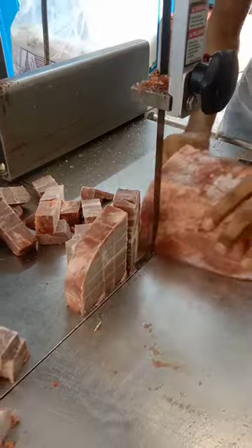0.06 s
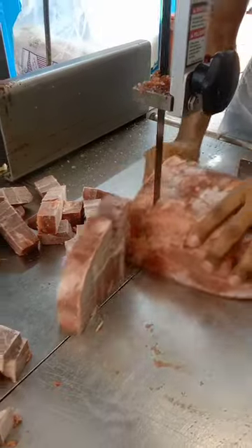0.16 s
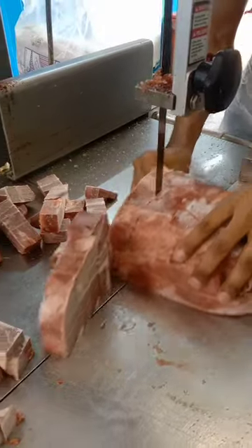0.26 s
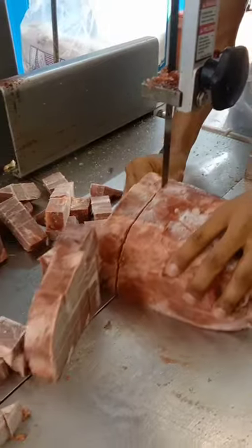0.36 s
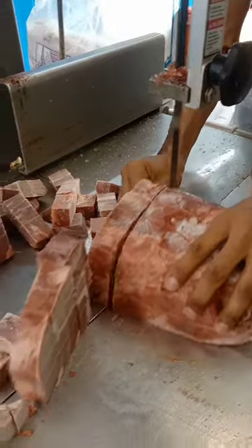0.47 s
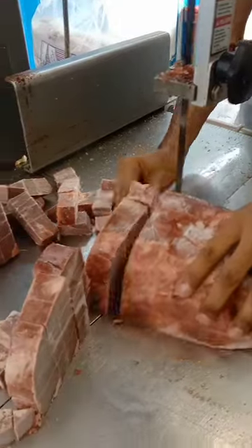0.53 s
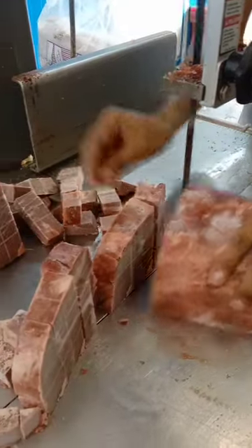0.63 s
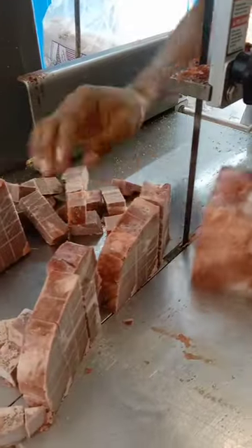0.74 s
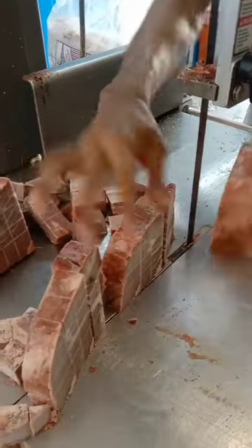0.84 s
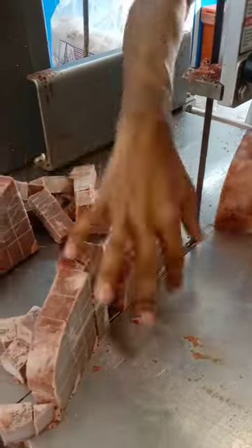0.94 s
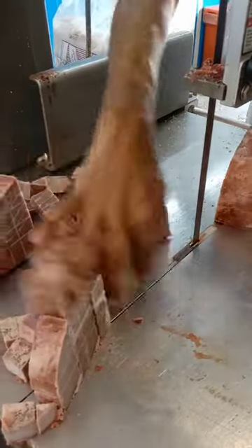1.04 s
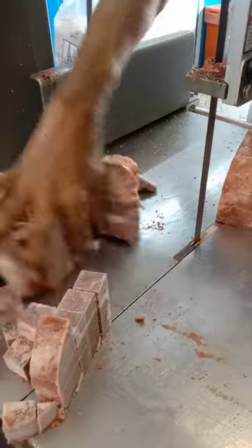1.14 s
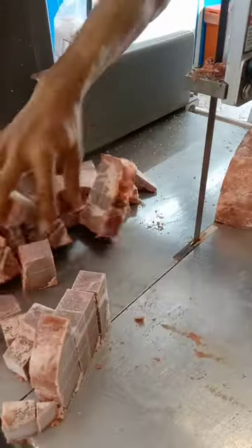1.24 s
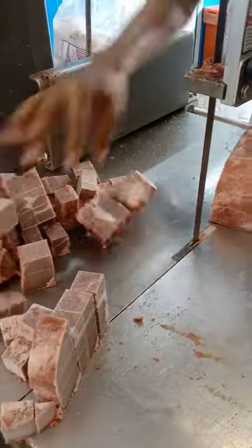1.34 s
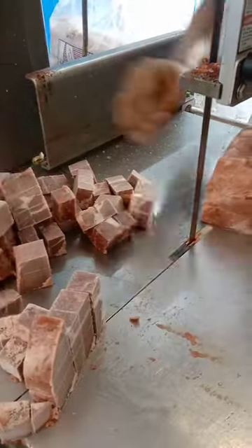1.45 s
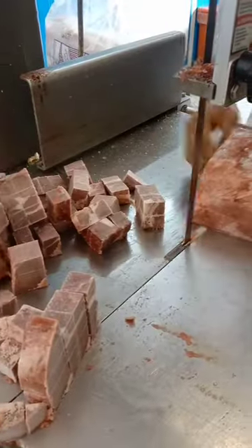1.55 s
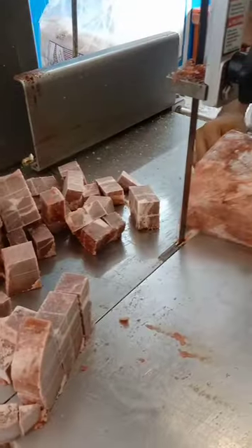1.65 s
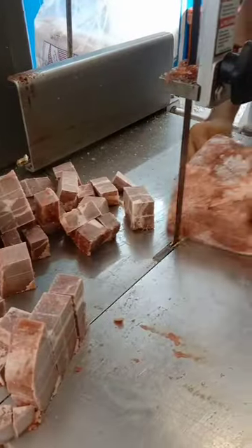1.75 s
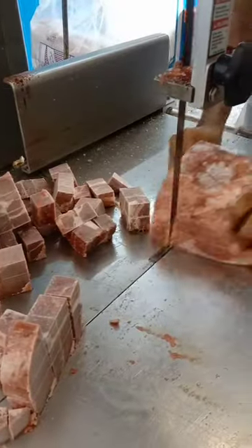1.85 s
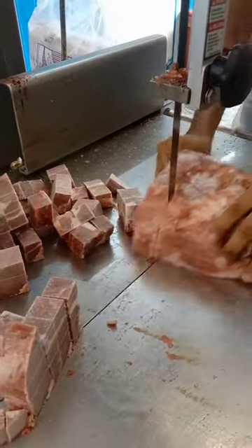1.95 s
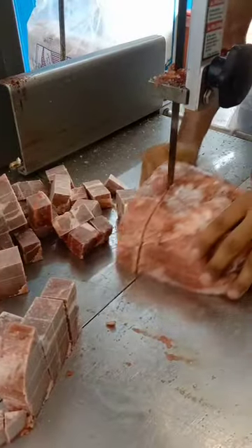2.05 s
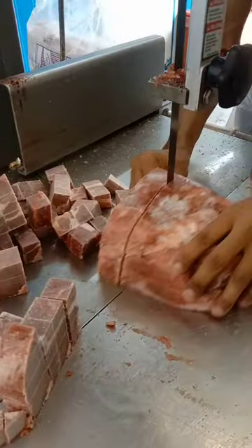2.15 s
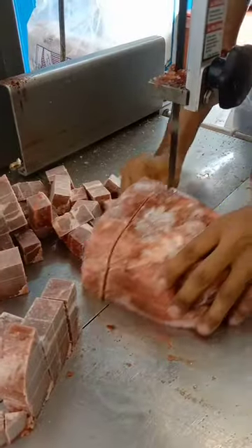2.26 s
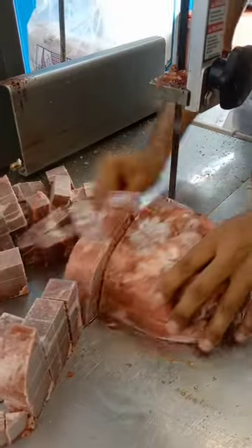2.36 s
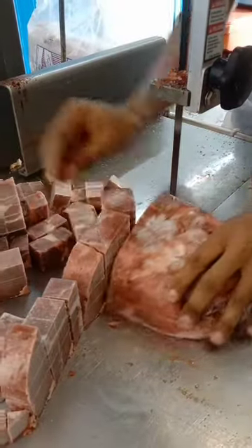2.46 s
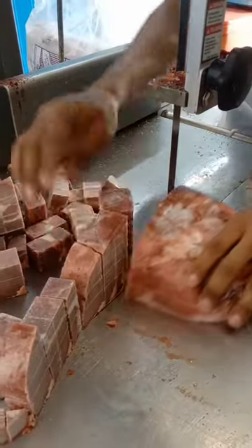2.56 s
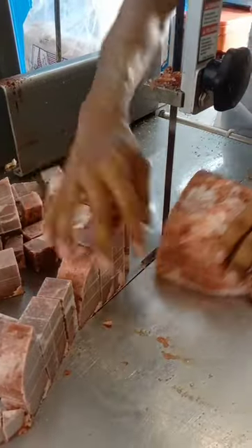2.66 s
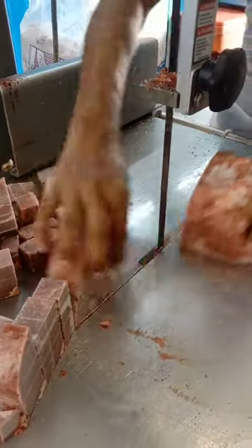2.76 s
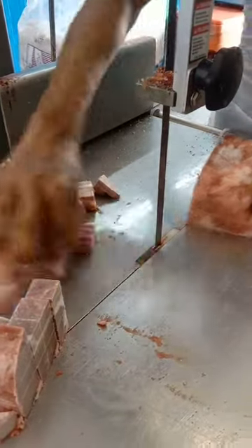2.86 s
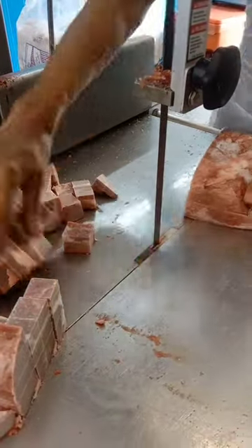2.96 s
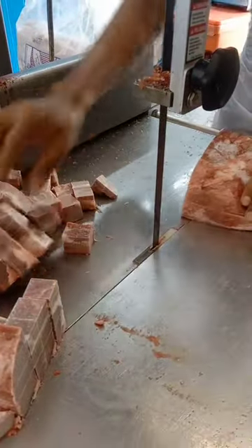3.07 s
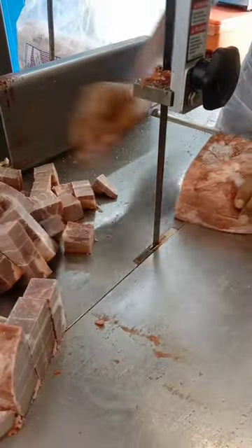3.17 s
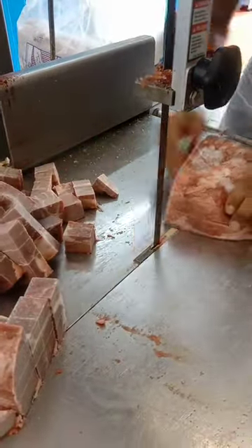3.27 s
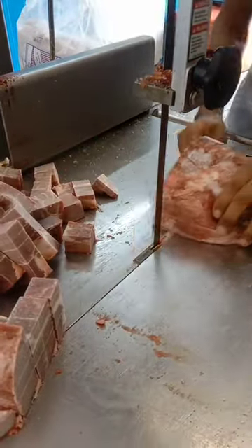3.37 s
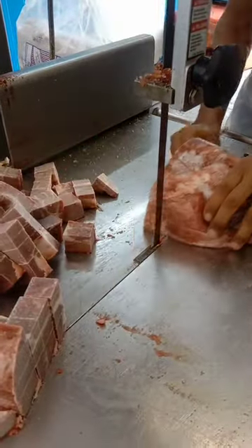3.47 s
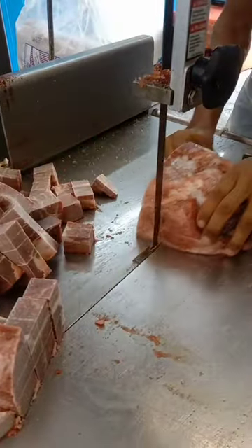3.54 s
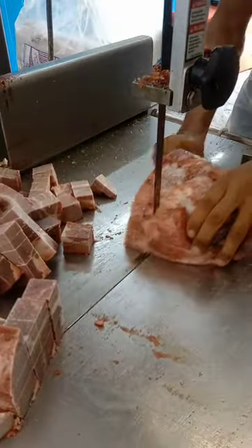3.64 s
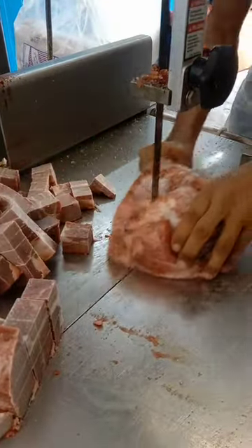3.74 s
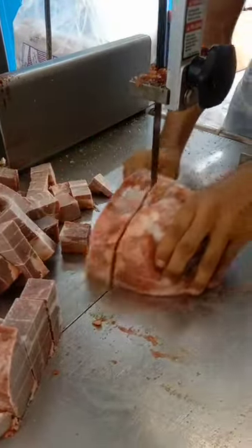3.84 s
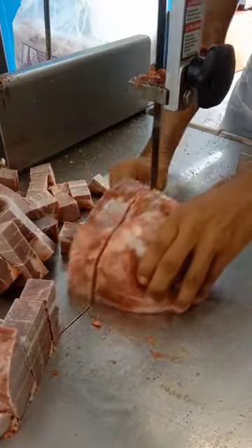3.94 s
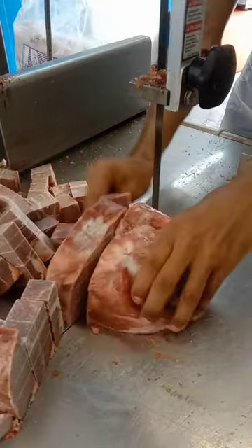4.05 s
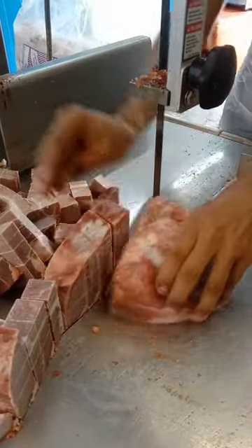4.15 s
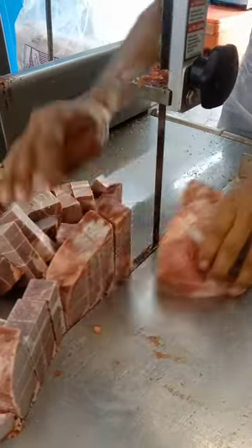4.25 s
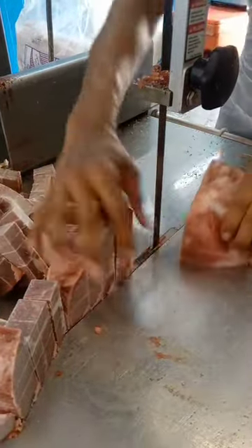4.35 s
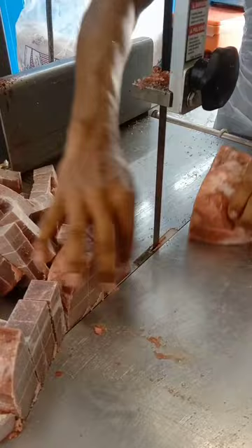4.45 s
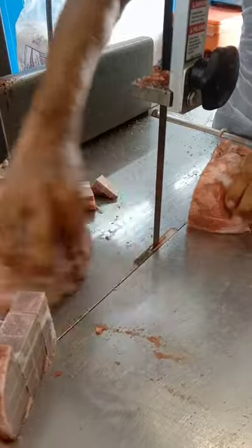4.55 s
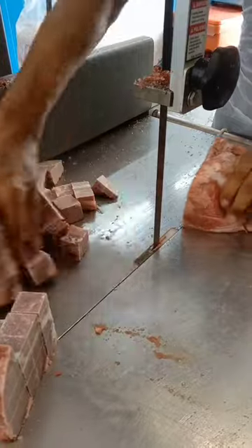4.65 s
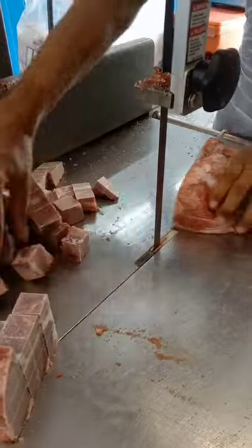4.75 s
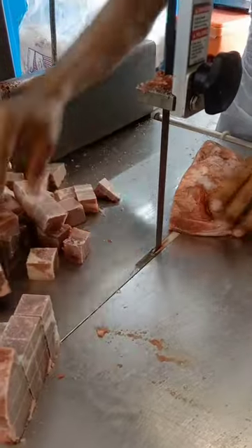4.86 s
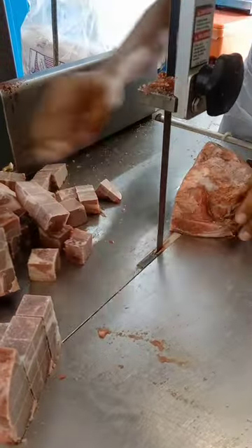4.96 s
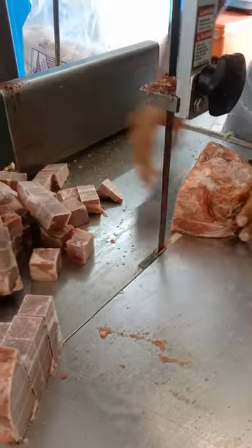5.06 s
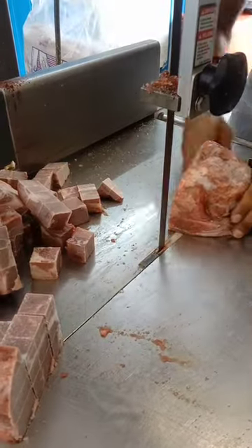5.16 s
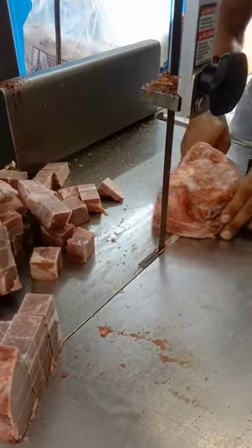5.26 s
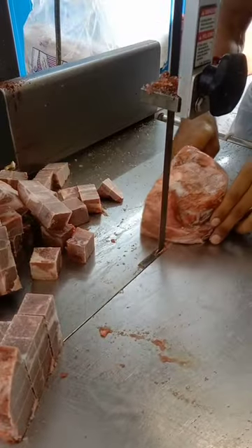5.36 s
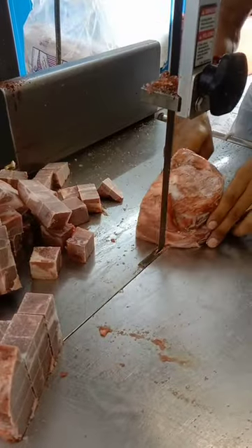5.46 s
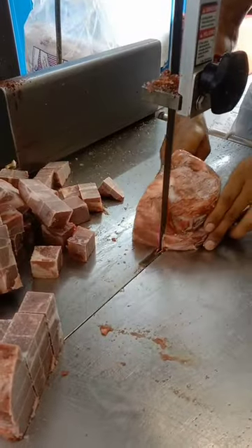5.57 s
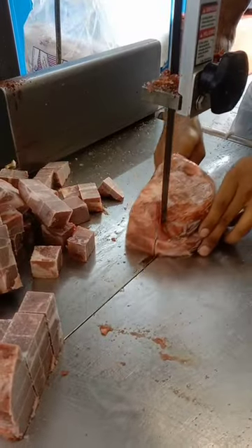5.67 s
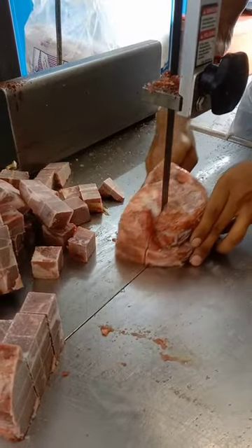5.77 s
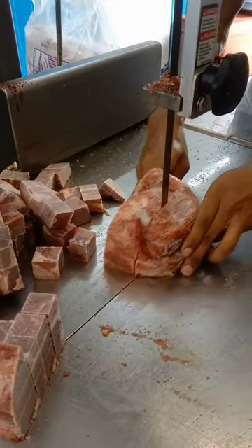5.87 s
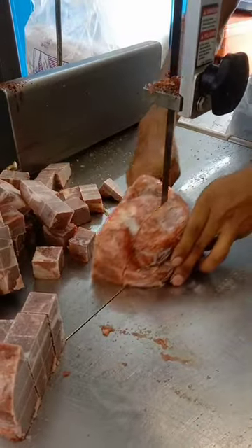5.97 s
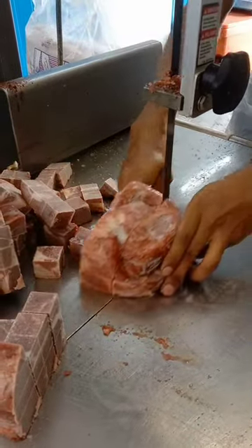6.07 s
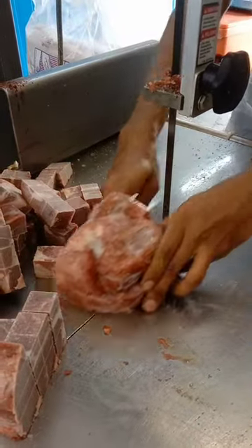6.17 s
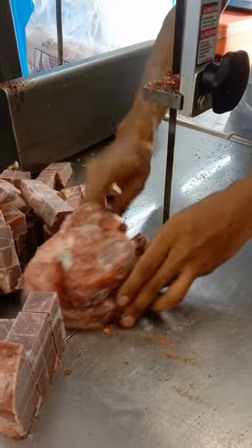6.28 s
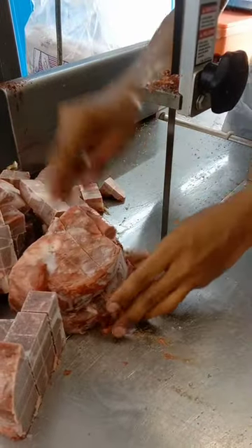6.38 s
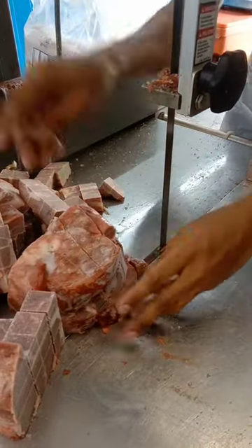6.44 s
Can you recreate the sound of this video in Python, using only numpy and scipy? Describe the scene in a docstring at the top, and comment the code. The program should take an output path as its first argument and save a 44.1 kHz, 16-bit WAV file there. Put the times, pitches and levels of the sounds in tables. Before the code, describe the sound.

A meat band saw runs throughout, close to a phone with little deep bass: rough midrange steel drone, motor rumble, faint mains hum and bright blade hiss, pulsing about every 0.18 s with tiny spits. At 0.16-0.58 s frozen meat enters; the drone drops, the noise turns grinding and a rough, flickering whine near 6 kHz sags slightly, with small airy chip pops. The free blade returns, cubes knocking dully around 1.2-1.45 s. A second cut runs 1.9-2.4 s, again with pops; ticks and a firm knock follow near 2.65-3.2 s. The third cut lasts 3.64-4.07 s. Ticks cluster at 4.76-4.92 s with a brief machine surge. The loudest tick at 5.16 s follows a short dip; the saw sinks and recovers. Two cuts run back to back, 5.56-6.22 s, with a late chip pop. A thin 3.3 kHz tone rings from 6.3 s as the saw continues to the end.

```python
"""A meat band saw runs close to a phone: shaped noise makes frame drone, motor rumble, blade hiss and fizz; a sine hums.
The drone, hiss and fizz swell once per lap of the weld. In frozen meat the noise changes colour and the slowing
teeth whine as flickering harmonics. Noise bursts make cubes knock on the steel table, ticks at the blade and high
spits; chips pop as short air pulses; a thin tone rings late. Machine and whine dip briefly before sudden sounds."""
import sys
import numpy as np
from scipy.fft import rfft, irfft, next_fast_len
from scipy.io import wavfile
from scipy.ndimage import map_coordinates

SR = 44100
rng = np.random.default_rng(int(sys.argv[2]) if len(sys.argv) > 2 else 0)


def to_wav(sig):
    """Store sig (one row per channel, or 1-D mono) as 16-bit WAV at the path in sys.argv[1].

    Samples outside -1..1 are clipped; the rate is SR.
    """
    pcm = np.clip(np.atleast_2d(sig), -1, 1) * 32767
    pcm = np.round(pcm).astype(np.int16)
    wavfile.write(sys.argv[1], SR, pcm.T)  # frames by channels


N = 287091

# pushes of meat into the blade: start/s, end/s
CUTS = [(.16, .58), (1.91, 2.38), (3.64, 4.07), (5.56, 5.93), (5.935, 6.22)]
# running machine: t/s, base level/dB; relative to it: rumble/dB, hum/dB, hiss and fizz/dB
RUN = [(0, -28, -6, -24, 1), (.17, -27.5, -5, -29, -0.5), (.23, -34.5, -2.5, -8, 0),
       (.6, -35, -5, -15, -1.5), (.9, -28.5, -7.5, -18, -1), (1.3, -28.5, -4, -10, 0),
       (1.9, -27.5, -6.5, -33, -1.5), (1.97, -37, -0.5, -27, 0), (2.42, -37, -4, -16, 0),
       (2.56, -27.5, -2, -6.5, -1), (2.98, -27, -8, -22, -0.28), (3.17, -30.5, -10.5, -23, 0),
       (3.62, -30, -5, -31, 0.5), (3.68, -36.5, -3, -16, 5), (4.1, -37, -0.5, -14, -0.5),
       (4.22, -29.5, -4, -13, -0.5), (4.3, -30, -4, -13, 3), (4.37, -29.5, -7, -13, -0.5),
       (4.55, -29.5, -5, -18, 0.5), (4.72, -30.5, -2, 0, 0.5), (4.8, -29.5, -4.5, -14, 1),
       (4.9, -23, -10, -20, -2), (4.97, -33.5, -7, -16, 1), (5.06, -32.5, -6, -5, 0),
       (5.14, -31.5, -2.5, -10, 3.5), (5.19, -35, -8.5, -22, 1), (5.38, -32.5, -8.5, -9, 1.5),
       (5.55, -31, -3.5, -7, 0), (5.7, -34, -0.5, -10, 2), (6.2, -37.5, 1, -1, 0), (6.36, -30, -4, -11, 0),
       (6.51, -31, -5, -26, -0.58)]
# spectrum of the frame drone: f/Hz, relative level/dB
DRONE_SPECTRUM = [(280, -27.5), (480, -8), (699, -6), (796, -3.5), (860, -2), (1230, -3), (1490, -2.5),
                  (1730, -5.5), (2160, -10), (3000, -9), (3900, -45), (6600, -120)]
# spectrum of the motor rumble: f/Hz, relative level/dB
RUMBLE_SPECTRUM = [(18, -59), (30, -27), (48, -27), (83, -7), (140, -7), (300, -1.5), (388, -1),
                   (560, -10.5), (730, -79), (1230, -120)]
# ringing panels and motor orders: f/Hz, width/Hz, peak over the noise floor/dB
FRAME_PEAKS = [(153.5, 15, 5.5), (248.3, 6.2, 11), (293.4, 2.2, 10.5), (307.7, 5.8, 13), (360, 6.8, 4),
               (393.8, 9.2, 8.5), (512, 8.5, 2.5), (865.5, 3.7, 16.5), (981, 11, 8.5), (1075, 26, 8),
               (1335, 5.4, 11), (1473, 5.8, 10), (1516, 8.2, 9.5), (1628, 5.1, 11.5), (1907, 53, 5),
               (2030, 8.7, 11)]
# band of the frame that falls quiet under load: f/Hz, width/Hz, share lost
HOLLOW = (460, 350, 0.36)
# hiss of the free blade: f/Hz, relative level/dB
HISS_SPECTRUM = [(1180, -43), (2000, -35), (2140, -23), (2440, -24.5), (3260, -11.5), (3370, -13),
                 (4180, -12.5), (4830, -5), (6090, 2), (7290, -6), (9110, -22), (9930, -20), (11100, -22.5),
                 (14900, -20), (15500, -36)]
# blade and guide resonances: f/Hz, width/Hz, peak over the noise floor/dB
BLADE_PEAKS = [(2410, 3.9, 19.5), (3293, 9.5, 10), (3474, 18.5, 13), (3807, 81, 7), (4870, 60, 9),
               (5200, 21, 10), (5380, 50, 1.5), (5716, 74, 6.5), (6080, 26, 7.5), (6370, 36, -6),
               (7100, 40, -3), (6630, 37, 8.5), (7180, 25, 10)]
# fizz of the free blade: f/Hz, relative level/dB
FIZZ_SPECTRUM = [(4710, 1), (8000, -0.5), (9110, -11), (9950, -7), (11100, -12), (14900, -14), (15500, -8)]
# blade in the meat, lower band: f/Hz, relative level/dB
GRIND_SPECTRUM = [(1180, -42), (2000, -16), (2230, -26), (2710, -28.5), (2920, -16.5), (3230, -18.5),
                  (3870, -12), (4310, -20.5), (4830, -8.5), (5900, 0), (9000, -23), (11700, -48),
                  (19800, -120)]
# blade in the meat, upper band: f/Hz, relative level/dB
RASP_SPECTRUM = [(4710, -28), (8000, -8), (8390, -23), (9320, -14), (9630, -5.5), (13800, 3.5), (14900, 8),
                 (15500, -3)]
# one list per push: t/s, grind/dB, rasp/dB, grip on the teeth/dB, lift of the second harmonic/dB
BITE = [
    [(0.16, -19, -36, -2, 0), (0.174, -12.5, -24, -6, 2), (0.208, -17, -29, -6, -5),
     (0.29, -12.5, -28.5, -0.5, 0), (0.422, -17, -32, 0, 2), (0.432, -15, -29, -1.5, 3),
     (0.518, -18, -36, -3, 14.5), (0.56, -14.5, -32, -2, 6), (0.58, -31, -42, 0, 0)],
    [(1.91, -13, -27, -9, -14), (2.0, -19, -30, 7, 0), (2.018, -18, -34, 1, -2), (2.092, -16, -28, 3, 6.5),
     (2.134, -19, -36, 0.5, 2), (2.17, -13, -29.5, -4.5, 0), (2.292, -19, -31.5, 0, 6),
     (2.328, -13, -32, -6, -4), (2.38, -23.5, -41, -1, 16)],
    [(3.64, -16, -38, -4, 0), (3.658, -14.5, -29, -4, 7), (3.736, -19, -31.5, 0.5, 7),
     (3.786, -23, -30, 0, 0), (3.804, -13.5, -33, 4, -12), (3.838, -19.5, -29, 3, 4),
     (3.898, -14.5, -30.5, -0.5, 2), (4.032, -16, -32, -3.5, 6.5), (4.07, -20, -36, -7, 14)],
    [(5.56, -23, -37, 0, 0), (5.57, -15, -29, 6, 0), (5.602, -15.5, -33, -4, -7),
     (5.748, -21.5, -28, -2.5, 12), (5.798, -16.5, -24.5, -3.5, 6), (5.876, -14, -30, -2.5, 3),
     (5.894, -15.5, -25, 0, 0), (5.926, -13, -30, -2, 7), (5.93, -13, -31, 0, 5)],
    [(5.935, -12, -32, 0, 0), (5.951, -15.5, -30, 1, 0), (5.965, -19.5, -29.5, 9, -11),
     (6.093, -17.5, -27.5, 4.5, -14), (6.111, -20, -29, 3.5, 0), (6.177, -16.5, -29.5, -2.5, -6),
     (6.189, -20.5, -32, 0, 0), (6.211, -21.5, -33, 2, -3), (6.22, -24, -43, 0, 0)],
]
# swell scale per lap: drone/dB, hiss/dB, fizz/dB
LAP_DB = (1.5, 2.5, 6)
# size of each lap's swell, in order: factor
LAP_SIZES = [0.79, 0.47, 0.74, 0.77, 0.92, 0.47, 1.16, 0.78, 1.4, 1.12, 0.9, 0.78, 1.4, 1.3, 0.29, 0.66,
             0.96, 0.93, 1.04, 0.85, 1.1, 0.47, 1.2, 1.2, 0.7, 0.97, 1.06, 0.53, 0.71, 0.6, 0.45, .9, 0.7,
             1.6, 0.47, 1, 0.78]
# whine: multiple of the tooth rate, relative level/dB
HARMONICS = [(1, -27.5), (2, -18), (3, -28), (4, -13.5), (5, -8), (6, 4), (7, -3), (8, -12), (9, -21.5),
             (10, -19.5), (11, -21.5), (12, -18.5), (13, -21), (14, -30), (15, -16)]
# load on the teeth, per push: entry f/Hz, loaded f/Hz, time to half the loss/s, rise time constant/s,
# lift of the fundamental/dB, of the fifth and seventh/dB, of the eighth/dB
SAG = [(996, 971, .11, .05, 0, 0, 0), (1002, 975, .15, .05, 0, -1, 0), (999, 975, .17, .02, 0, 0, -2),
       (1000, 973, .29, .06, 4, 0, -3), (987, 972, .23, .012, 8, -7, 5)]
# cubes on the table: t/s, relative level/dB
KNOCKS = [(0.16, -10), (1.232, -3.5), (1.398, -13), (1.435, -4), (1.44, -6), (1.913, -11), (2.099, -14),
          (2.672, -21), (2.971, -2), (3.844, -26), (4.429, -15), (4.921, -11), (5.135, -33), (5.577, -7.5),
          (5.585, -16)]
# resonances of the steel table: f/Hz, width/Hz, level/dB
TABLE_MODES = [(610, 610, -5.5), (1200, 680, 2.5), (1440, 480, 3.5), (2580, 1700, -17)]
# sharp ticks at the blade: t/s, relative level/dB
TICKS = [(0.5531, -3), (2.66, -6), (2.9305, -5), (3.0234, -3), (3.1988, -4), (3.5497, -4), (4.7643, -1),
         (4.7894, -4), (4.817, -7), (4.9218, -1), (5.1641, 2), (6.1709, -7)]
# spits of scraps at the blade: t/s, relative level/dB
SCRAPS = [(0.1635, -19), (0.2423, -10), (1.9111, -15), (2.0028, -14), (3.6591, -13), (5.5687, -13),
          (5.7399, -20), (5.9454, -16), (6.0102, -19), (6.0581, -9)]
# weld spit relative to the base level: first guide/dB, second guide/dB
WELD_DB = (9, 10)
# chips near the microphone: t/s, relative level/dB, time constant/ms
POPS = [(0.287, -21, 1.3), (0.389, -16, 0.85), (0.439, -26, 1.7), (2.171, -22, 1.3), (2.216, -17, 1.4),
        (2.229, -17, 0.57), (2.247, -26, 1.3), (6.067, -19, 1.3)]
# thin tone after the last cut: t/s, f/Hz, level/dB, t60/s
RING = (6.31, 3275, -33, 2.5)
# dips of machine and whine: start/s, end/s, depth/dB
DIPS = [(.143, .16, -9), (1.9, 1.911, -3), (3.627, 3.642, -8), (4.907, 4.921, -4), (5.148, 5.1645, -19),
        (5.927, 5.937, -4)]

HISS_DB, FIZZ_DB = 8, -6.5  # relative to the base level
FIZZ_GROWS = 1.25  # fizz swings wider than the base level
WHINE_DB, BRIGHT_DB = -6.5, 6.5  # harmonics to the eighth over the grind; higher ones over the rasp
SAG_S = 0.046  # how quickly the tooth rate gives way
LAP_S, LAP_START_S, GUIDE_GAP_S = .1759, .013, .037
LAP_RISE_S, LAP_FALL_S = 0.0084, 0.084
# after the loudest tick drone, hiss and fizz sink and return
SINK_S, SINK_DB, RECOVER_S = 5.165, (-15, -7, -20), .075
HUM_HZ = 100
LOW_HZ, TOP_HZ, PEAK = 70.5, 15520, .9


def machine():
    """Frame, blade and hum together; meat around the blade recolours hiss and fizz and hollows the frame."""
    level_db, rumble_db, hum_db, hiss_db = curves(RUN)
    drone_moves_db, hiss_moves_db, fizz_moves_db = np.outer(LAP_DB, swell()) + np.outer(SINK_DB, sink())
    buried = sum((seconds() > start) & (seconds() < end) for start, end in CUTS) > 0
    grind, rasp, *_ = bite()
    flutter = wobble(30)  # the blade flutters: hiss and fizz move together
    frame = drone(level_db + drone_moves_db)
    frame += rumble(level_db + rumble_db + 0.4 * drone_moves_db)
    frame -= buried * hollow(frame)
    hiss = np.where(buried, meat_grind(grind), free_hiss(level_db + hiss_db + hiss_moves_db))
    fizz = np.where(buried, meat_rasp(rasp), free_fizz(level_db, hiss_db + fizz_moves_db))
    blade = amp(0.41 * flutter) * hiss + amp(0.63 * flutter) * fizz
    return frame + blade + hum(level_db + hum_db)


def drone(level_db):
    """Steel frame: rough noise with ringing panel peaks."""
    return amp(level_db + 0.17) * rush(DRONE_SPECTRUM, FRAME_PEAKS, grit_db=1.03)


def rumble(level_db):
    """Motor: low rough noise with the same frame peaks."""
    return amp(level_db + 1.0) * rush(RUMBLE_SPECTRUM, FRAME_PEAKS, grit_db=1.0)


def hollow(frame):
    """The part of the frame sound lost under load: one Gaussian band."""
    centre_hz, width_hz, share = HOLLOW
    return filtered(frame, lambda f: share * np.exp(-((f - centre_hz) / width_hz) ** 2))


def free_hiss(level_db):
    """Free blade rubbing its guides: noise with blade resonances."""
    return amp(level_db + HISS_DB) * rush(HISS_SPECTRUM, BLADE_PEAKS, grit_db=0.5)


def free_fizz(level_db, moves_db):
    """Airy noise above the hiss, flickering, with widened level swings."""
    mean_db = level_db.mean()
    wide_db = mean_db + FIZZ_GROWS * (level_db - mean_db)
    return amp(wide_db + FIZZ_DB + moves_db + 3.6 * wobble(8)) * rush(FIZZ_SPECTRUM, [], grit_db=2.34)


def meat_grind(gain):
    """Blade in the meat, lower band: rough noise without resonances."""
    return gain * amp(-2.0) * rush(GRIND_SPECTRUM, [], grit_db=1.0)


def meat_rasp(gain):
    """Blade in the meat, upper band: rougher bright noise."""
    return gain * rush(RASP_SPECTRUM, [], grit_db=2.0)


def bite():
    """Gains of grind, rasp, grip and second harmonic, practically silent between pushes."""
    return sum(amp(curves(cut, outside=-120)) for cut in BITE)


def swell():
    """Rise and fall after each pass of the weld."""
    t = seconds() - LAP_START_S
    since = t % LAP_S
    lap = np.clip(t // LAP_S, 0, len(LAP_SIZES) - 1).astype(int)
    size = np.asarray(LAP_SIZES)[lap]
    return size * (1 - np.exp(-since / LAP_RISE_S)) * np.exp(-since / LAP_FALL_S) * 2


def laps():
    """Times at which the weld meets the second, lower guide."""
    return np.arange(LAP_START_S, N / SR, LAP_S)


def sink():
    """1 just after the loudest tick, dying to 0."""
    since = seconds() - SINK_S
    return (since > 0) * np.exp(-np.abs(since) / RECOVER_S)


def whine(steady=4.5, flicker_rate=70, spread=1.9):
    """Harmonics of the tooth rate; uneven teeth make each flicker in size and phase and smear the high ones."""
    teeth_hz, rise, lifts = tooth_load()
    turn = 2 * np.pi * np.cumsum(teeth_hz * (1 + .005 * wobble(30))) / SR
    grind, rasp, grip, second = bite()
    low = amp(WHINE_DB) * grind * grip * rise
    high = amp(BRIGHT_DB + 2.0 * wobble(14)) * rasp * rise
    own = {1: lifts[0], 2: second, 5: lifts[1], 7: lifts[1], 8: lifts[2]}
    out = np.zeros(N)
    for k, db in HARMONICS:
        rate = flicker_rate + spread * k ** 2  # knots/s
        uneven = unit(steady / k + wobble(rate) + 1j * wobble(rate))
        gain = high if k > 8 else low * own.get(k, 1) * amp(2 * wobble(14))
        out += amp(db) * gain * np.sqrt(2) * np.real(uneven * np.exp(1j * k * turn))
    return out


def tooth_load():
    """Tooth rate giving way under load, onset of the whine and harmonic lifts; zero between pushes."""
    t, teeth_hz, rise, lifts = seconds(), np.zeros(N), np.zeros(N), np.zeros((3, N))
    for (start, end), (entry_hz, loaded_hz, half_s, rise_s, *lift_db) in zip(CUTS, SAG):
        inside = (t > start) & (t < end)
        speed_left = (1 - np.tanh((t - start - half_s) / SAG_S)) / 2
        teeth_hz += inside * (loaded_hz + (entry_hz - loaded_hz) * speed_left)
        rise += inside * (1 - np.exp(-np.abs(t - start) / rise_s))
        lifts += np.outer(amp(lift_db), inside)
    return teeth_hz, rise, lifts


def knocks():
    """Frozen cubes: blows and short noise ring the dull modes of the steel table."""
    blows = bursts(KNOCKS, t60_s=.035, noise_db=4.5, blow_db=20.5)
    return filtered(blows, modes(TABLE_MODES))


def ticks():
    """Sharp clicks through the bright band of the blade, applied twice."""
    band = modes([(5860, 1300, 0)])
    clicks = bursts(TICKS, t60_s=.014, noise_db=2.5, blow_db=19)
    return filtered(clicks, lambda f: band(f) ** 2)


def spits():
    """Thin bursts of high hiss: scraps, and the weld at both guides, harder on laps that swell more."""
    band = modes([(11200, 5600, 0)])
    s, level_db, *_ = np.transpose(RUN)
    sunk = sink()
    weld = []
    for lap, size in zip(laps()[1:], LAP_SIZES[1:]):
        for at, db in zip((lap - GUIDE_GAP_S, lap), WELD_DB):
            base_db = np.interp(at, s, level_db) + SINK_DB[2] * sunk[round(at * SR)]
            weld.append((at, base_db + db + 5 * (size - 1)))
    hits = bursts(SCRAPS + weld, t60_s=0.05, noise_db=-4, blow_db=-3)
    return filtered(hits, lambda f: band(f) ** 2)


def pops():
    """Flying chips: one push of air and its slower rebound."""
    out, t = np.zeros(N + SR), np.arange(SR // 20) / SR
    for s, db, ms in POPS:
        u = t * 1000 / ms
        out[round(s * SR):][:len(t)] += amp(db + 6.5) * u * (1 - u / 2) * np.exp(-u) * np.e
    return out[:N]


def ring():
    """A thin tone of slightly unsteady level, dying away."""
    start, hz, db, t60_s = RING
    since = seconds() - start
    level = amp(db - 60 * np.abs(since) / t60_s + 3 * wobble(25))
    return (since > 0) * level * np.sin(2 * np.pi * hz * since)


def hum(level_db):
    """Mains hum: one sine, unsteady in level and phase."""
    phase = 2 * np.pi * HUM_HZ * seconds() + 0.42 * wobble(13)
    return amp(level_db + 2.8 * wobble(14)) * np.sin(phase)


def dips():
    """Gain of machine and whine: falls fast, holds, returns at once."""
    t, db = seconds(), np.zeros(N)
    for start, end, depth_db in DIPS:
        db += depth_db * np.clip((t - start) / 0.0027, 0, 1) * (t < end)
    return amp(db)


def rush(spectrum, peaks, grit_db):
    """Noise of rms 1, roughened by grains of contact, with ringing peaks on its spectrum."""
    grains = amp(grit_db * (wobble(400) + wobble(60))) * rng.standard_normal(N)

    def response(f):
        power = 1 + sum(amp(db) ** 2 / (1 + (2 * (f - c) / w) ** 2) for c, w, db in peaks)
        return amp(along(spectrum, f)) * np.sqrt(power)

    return unit(filtered(grains, response))


def bursts(events, t60_s, noise_db, blow_db):
    """A one-sample blow and a short dying rattle of noise at each (t/s, level/dB)."""
    out, t = np.zeros(N + SR), np.arange(SR // 10) / SR
    for s, db in events:
        out[round(s * SR):][:len(t)] += amp(db + noise_db - 60 * t / t60_s) * rng.standard_normal(len(t))
        out[round(s * SR)] += amp(db + blow_db)
    return out[:N]


def modes(table):
    """Response of a causal sum of resonances with alternating signs."""
    return lambda f: sum((-1) ** k * amp(db) * 1j * f * w / (c * c - f * f + 1j * f * w)
                         for k, (c, w, db) in enumerate(table))


def filtered(x, response):
    """x times a complex response of frequency."""
    m = next_fast_len(N + SR // 2)
    return irfft(rfft(x, m) * response(np.fft.rfftfreq(m, 1 / SR)), m)[..., :N]


def wobble(rate):
    """A smooth random curve, rate knots a second."""
    return map_coordinates(rng.standard_normal(int(N * rate / SR) + 4), [np.arange(N) * rate / SR])


def curves(rows, outside=None):
    """One value per sample for each column after the time."""
    s, *cols = np.transpose(rows)
    return np.array([np.interp(seconds(), s, c, outside, outside) for c in cols])


def along(points, hz):
    """Interpolates (f/Hz, value) points on a log axis."""
    f, v = np.transpose(points)
    return np.interp(np.log(hz + 1), np.log(f + 1), v)


def seconds():
    """Time of each sample."""
    return np.arange(N) / SR


def amp(db):
    """dB to amplitude."""
    return 10 ** (np.asarray(db) / 20)


def unit(x):
    """Scales x to rms 1."""
    return x / np.sqrt(np.mean(np.abs(x) ** 2) + 1e-20)


def scene():
    """Dipped machine and whine, plus the undipped single sounds."""
    saw = (machine() + whine()) * dips()
    return (saw + knocks() + ticks() + spits() + pops() + ring())[None]


def record(dry):
    """The phone drops the deep bass, rounds the highest peaks and keeps nothing above its band limit."""
    thin = filtered(dry, lambda hz: (1j * hz / (1j * hz + LOW_HZ)) ** 2)
    rounded = thin / (1 + np.abs(thin / PEAK) ** 6) ** (1 / 6)
    return filtered(rounded, lambda hz: hz < TOP_HZ)


dry = scene()
out = record(dry)
to_wav(out)
```